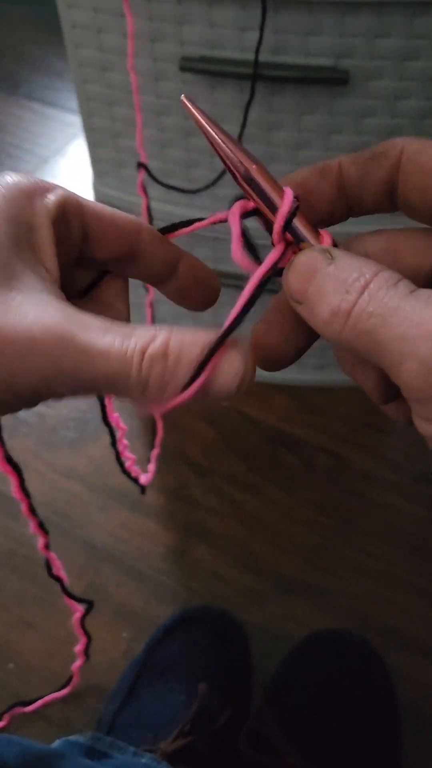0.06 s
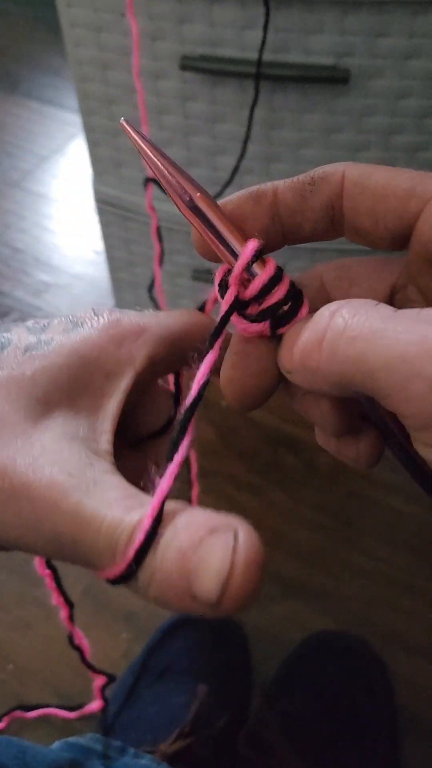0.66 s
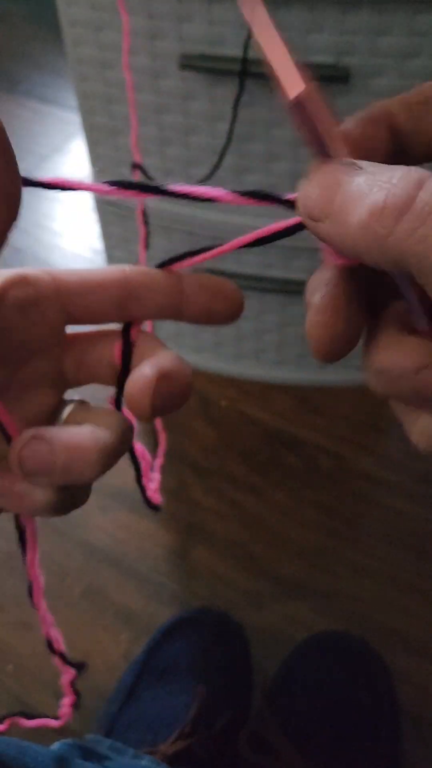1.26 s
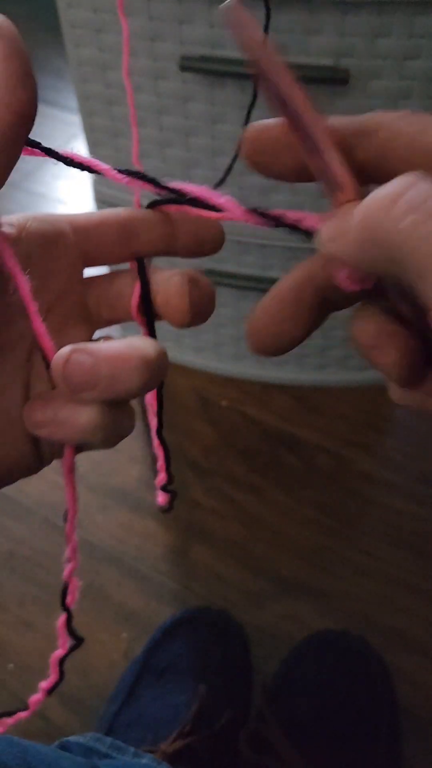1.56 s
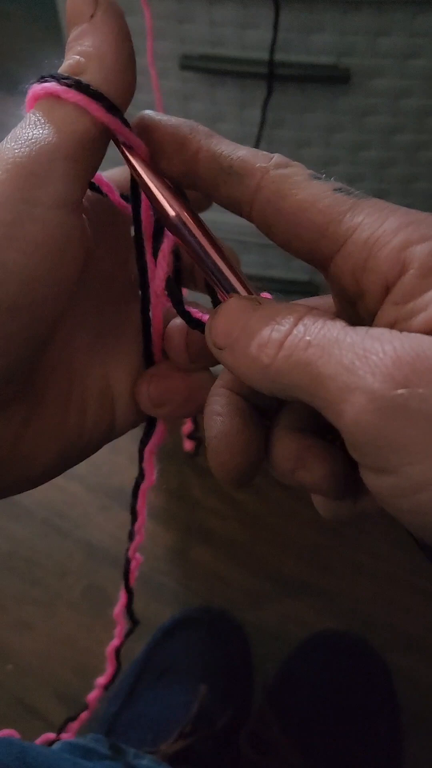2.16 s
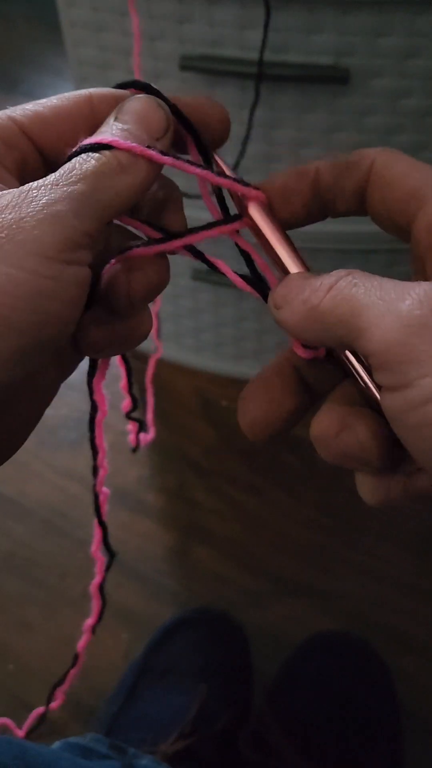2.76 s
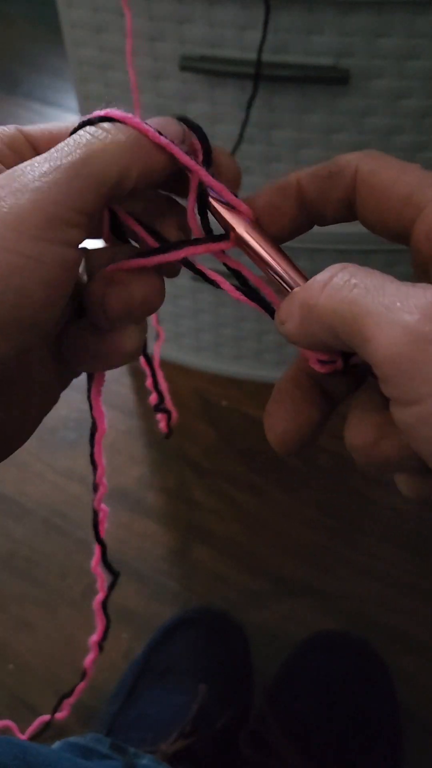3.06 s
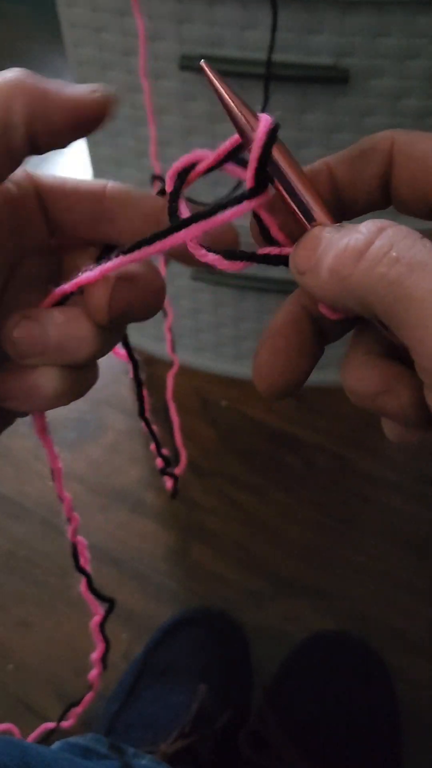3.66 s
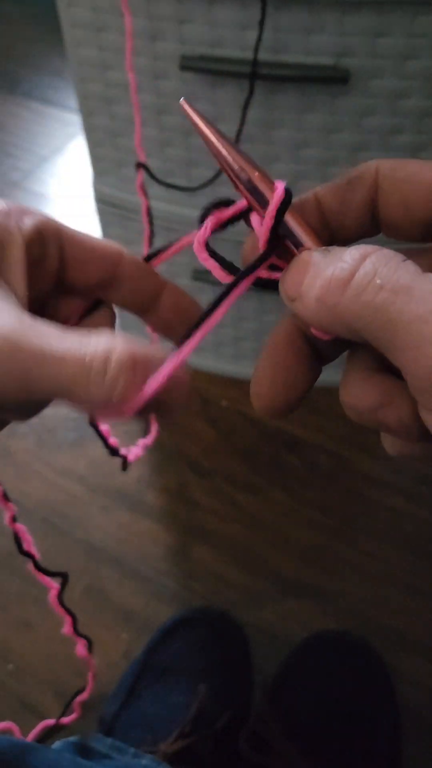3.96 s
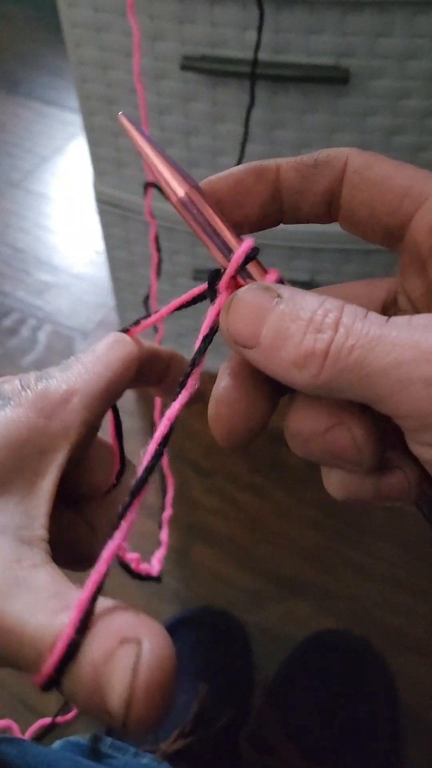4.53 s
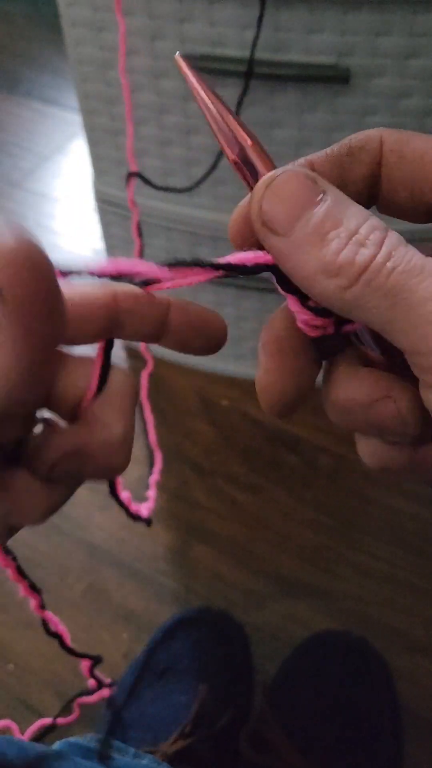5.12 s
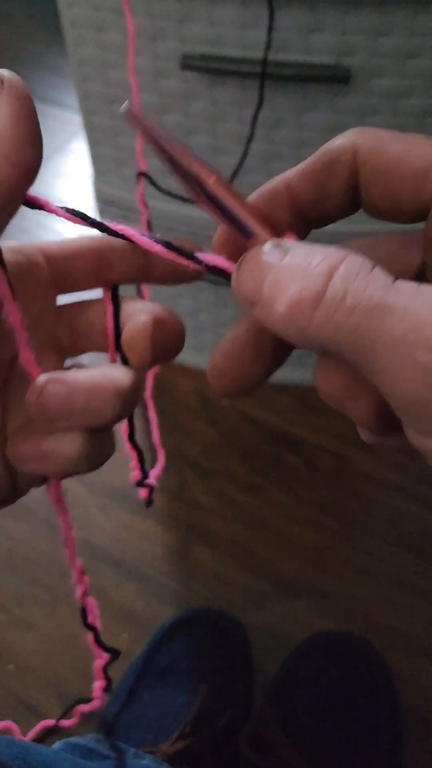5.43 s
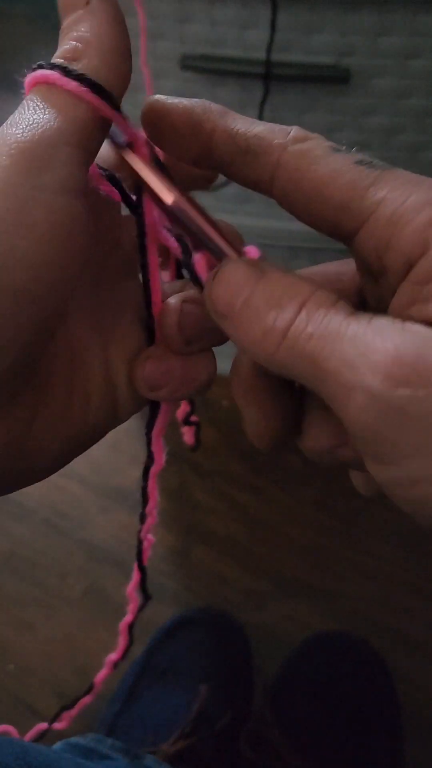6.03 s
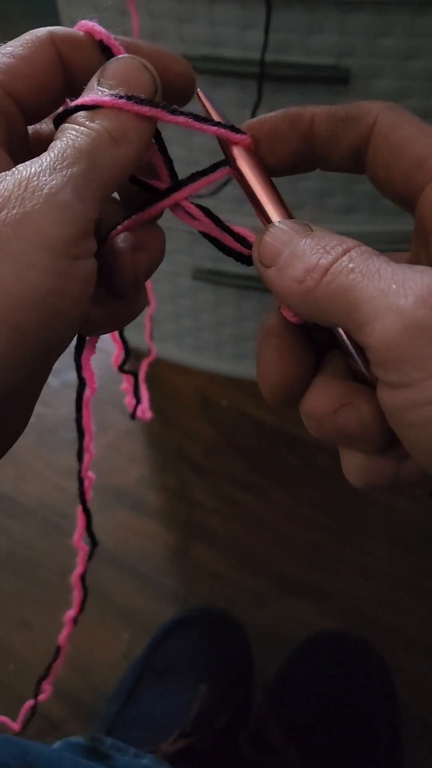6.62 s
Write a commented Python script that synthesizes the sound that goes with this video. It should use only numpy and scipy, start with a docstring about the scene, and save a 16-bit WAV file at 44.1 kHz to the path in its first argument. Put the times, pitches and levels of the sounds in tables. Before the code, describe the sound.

Very close to the microphone, yarn is drawn over fingers and metal knitting needles in soft, high, scratchy pulls and quick zips. Between pulls, a needle slides through the loops with a faint metallic ring, and strands now and then snap into place with a tiny tick. Later come a few dull, distant scuffs and one barely audible squeak. A low hum fills the quiet room throughout.

```python
"""Yarn rustles in long pulls as stitches are cast on to metal knitting needles, very close by.
The rustle is many tiny fibres catching and letting go. The needles sing faintly as they slide
through the loops, rubbing yarn gives one faint squeak, and strands snap into place with a tick.
A few soft scuffs sound further off, in a quiet room with a low hum."""
import sys
import numpy as np
from scipy import signal
from scipy.fft import rfft, irfft, next_fast_len
from scipy.io import wavfile
from scipy.ndimage import uniform_filter1d

SR = 44100
rng = np.random.default_rng(int(sys.argv[2]) if len(sys.argv) > 2 else 0)


def digitize_waveform(pressure):
    """Quantize a signal to 16-bit integers and store it at the path in sys.argv[1].

    Rows of a 2-D input are taken as channels; values are limited to [-1, 1].
    """
    field = np.atleast_2d(pressure).T
    bounded = np.clip(field, -1, 1)
    quanta = np.round(bounded * 32767).astype(np.int16)
    wavfile.write(sys.argv[1], SR, quanta)


N = 303665
TIME = np.arange(N) / SR
FFT_SIZE = next_fast_len(N)
FREQS = np.maximum(np.fft.rfftfreq(FFT_SIZE, 1 / SR), 1)
EARS = np.array([[1], [-1]])   # left, right
CUTOFF_HZ, YARN_LEFT_DB = 15450, 0.8


def from_db(db):
    """Turn decibels into a number to multiply by."""
    return 10 ** (np.asarray(db) / 20)


def unit_level(pair):
    """Scale a stereo sound so the average of its two sides has strength (rms) 1."""
    return pair / np.sqrt(np.mean(pair.mean(0) ** 2) + 1e-30)


def panned(left_db):
    """Two gains that make the left side left_db louder than the right."""
    return from_db(EARS * left_db / 2)


def over_hz(points):
    """Join (pitch_hz, value) points into a curve over all frequencies."""
    hz, value = np.transpose(points)
    return np.interp(np.log(FREQS), np.log(hz), value)


def stereo_tone(points):
    """Left and right gain curves from (pitch_hz, left_level_db, right_level_db) points."""
    return from_db([over_hz(np.array(points)[:, [0, side]]) for side in (1, 2)])


def filtered(pair, gain):
    """Turn each frequency of a sound up or down."""
    return irfft(rfft(pair, FFT_SIZE) * gain, FFT_SIZE)[:, :N]


def coloured(pair, gain):
    """Filter a sound, then bring it to strength 1."""
    return unit_level(filtered(pair, gain))


def resonance(hz, width_hz):
    """How a ringing object responds: most at its own pitch, less on either side."""
    return 1 / (1 + 1j * (FREQS ** 2 - hz ** 2) / (FREQS * width_hz))


def drift(rate_hz):
    """A smooth random wobble of strength 1."""
    return coloured(rng.standard_normal((1, N)), 1 / (1 + (FREQS / rate_hz) ** 2))[0]


def swell(middle_s, length_s):
    """A smooth rise and fall, at half strength a third of its length from the middle."""
    away = np.minimum(np.abs(3 * (TIME - middle_s) / length_s), 4)
    return np.exp(-np.log(2) * away ** 3)


# How far the room's sound leans left: pitch_hz, left_db
ROOM_BALANCE = [(80, -0.56), (260, -3.5), (400, -6), (600, 1.5), (900, -0.5), (1400, 5), (6500, 5),
                (9500, 8)]
# How alike the two sides are: pitch_hz, likeness (1 = the same)
EAR_LIKENESS = [(160, 0.99), (330, 0.86), (700, 0.38), (1400, 0.19), (4000, 0.069)]
def room_noise(gain, right_lag_s=0.00024):
    """Noise from all around: alike on both sides in the bass, unrelated in the treble."""
    alike = np.clip(over_hz(EAR_LIKENESS), -.999, .999)
    middle, side = rfft(rng.standard_normal((2, FFT_SIZE)))
    pair = irfft(np.sqrt(1 + alike) * middle + np.sqrt(1 - alike) * side * EARS, FFT_SIZE)
    delay = np.exp(1j * np.pi * FREQS * right_lag_s * EARS)
    return coloured(pair, gain * panned(over_hz(ROOM_BALANCE)) * delay)


# Pitches at which the surroundings ring: pitch_hz, boost_db
ROOM_RINGS = [(543, 7), (968, 4.5), (1570, 6), (1622, 5), (1718, 5), (1830, 5.5), (2292, 5.5)]
def room_ring(pair, width_hz=5.6):
    """The surroundings ring briefly at a few exact pitches."""
    boosts = sum((from_db(boost_db) - 1) * resonance(hz, width_hz) for hz, boost_db in ROOM_RINGS)
    return filtered(pair, 1 + boosts)


def wavering(tones):
    """Narrow bands of noise sound like tones that waver in strength and pitch."""
    bands = sum(from_db(db) / np.sqrt(width_hz) * np.abs(resonance(hz, 2 * width_hz)) ** 2
                for hz, width_hz, db in tones)
    return room_noise(bands)


def move_bass(pair, level_db, steady_above_hz=590):
    """The bass follows a level curve; the rest stays at the average level."""
    bass = filtered(pair, 1 / (1 + (FREQS / steady_above_hz) ** 6))
    return bass * from_db(level_db) + (pair - bass) * from_db(level_db.mean())


# The low hum, and fainter tones above it: pitch_hz, width_hz, relative_db
HUM_TONES = [(89.3, 2.9, 2), (82.7, 9.7, -2), (79.2, 1.8, -2), (109.7, 9.8, -12)]
FAINT_TONES = [(203.1, 3.8, -2), (231.4, 6, 3), (269.6, 1.8, -4.5), (299, 12, -12.5), (351, 30, -10.5),
               (636, 34, -10)]
# How the hum and the upper bass swell and sink: time_s, level_db
HUM_CURVE = [(0.0, -51), (1.1, -54), (2.9, -53), (3.55, -47), (3.85, -51), (4.15, -46.5), (4.52, -52.5),
             (4.75, -48.5), (5.5, -45), (6.0, -50), (6.3, -49)]
UPPER_BASS_CURVE = [(0.77, -65.5), (0.84, -70), (1.65, -65), (2.1, -66), (3.68, -61), (4.2, -65),
                    (5.4, -62), (6.19, -62), (6.89, -68.5)]
# Tone of the room's rumble and hiss: pitch_hz, relative_db
RUMBLE_TONE = [(12, -36), (31, -1), (48, 0.5), (80, -3.5), (115, -6.5), (170, -18.5), (270, -19.5),
               (380, -27), (460, -33.5), (620, -30.5), (850, -35), (1300, -52), (3000, -72)]
HISS_TONE = [(300, 3), (1000, 4), (2300, -0.5), (3200, -4), (4200, -6.5), (5400, -2.5), (6500, -13),
             (8000, -8), (11000, -7.5), (13500, -7)]
def room(hum_share=0.32):
    """A wavering low hum, a rumble that partly follows it, and a faint even hiss."""
    hum_db = np.interp(TIME, *np.transpose(HUM_CURVE))
    bass_db = np.interp(TIME, *np.transpose(UPPER_BASS_CURVE))
    hum = wavering(HUM_TONES)
    hum_power = uniform_filter1d(hum.mean(0) ** 2, size=SR // 4)
    hum = unit_level(hum / np.sqrt(hum_power))   # keep only the quick flutter
    faint_tones = move_bass(wavering(FAINT_TONES), bass_db - 4)
    rumble_db = bass_db + hum_share * (hum_db - bass_db) + 6.5
    rumble = move_bass(room_noise(from_db(over_hz(RUMBLE_TONE))), rumble_db)
    hiss = from_db(-78) * room_noise(from_db(over_hz(HISS_TONE)))
    return from_db(hum_db) * hum + faint_tones + room_ring(rumble + hiss)


# Soft swells of deep rumble: middle_s, length_s, level_db
RUMBLE_SWELLS = [(3.402, 0.34, -62), (6.61, 0.59, -52.5)]
def deep_rumble():
    """The deepest rumble rises and falls now and then."""
    strength = sum(from_db(db) * swell(middle_s, length_s) for middle_s, length_s, db in RUMBLE_SWELLS)
    return strength * room_noise(resonance(hz=38, width_hz=28) ** 2)


# The tone all scuffs share: pitch_hz, relative_db
SCUFF_TONE = [(380, 2), (470, 0.5), (620, 7), (770, -1), (950, 2), (1280, -12.5), (1650, -0.5),
              (1900, -0.5), (2500, -14), (3350, -8.5), (4150, -42)]
# Scuffs further off: start_s, rise_s, level_db, pitch_hz, width (as a share of the pitch)
SOFT_SCUFFS = [(4.853, 0.024, -64.5, 705, 1.6), (4.89, 0.023, -62.5, 420, 1.64),
               (5.016, 0.04, -62.5, 1430, 4.1), (5.295, 0.035, -65, 380, 3), (5.455, 0.06, -72.5, 795, 1.8),
               (5.688, 0.033, -62.5, 390, 0.62), (6.45, 0.044, -72, 450, 1.4), (6.77, 0.028, -73, 516, 1.4)]
def scuffs():
    """Dull brushing noises rise quickly and fade, each around its own pitch."""
    out = np.zeros((2, N))
    brush = room_noise(from_db(over_hz(SCUFF_TONE)))
    for start_s, rise_s, level_db, hz, width in SOFT_SCUFFS:
        age = np.clip((TIME - start_s) / rise_s, 0, 20)
        strength = from_db(level_db) * (age * np.exp(1 - age)) ** 1.6
        out += strength * coloured(brush, resonance(hz, width * hz) ** 3)
    return room_ring(out)


def squeak(middle_s=5.62, length_s=0.28, level_db=-87, pitch_hz=3640, width_hz=70, rise_hz_per_s=2200):
    """A thin, faint squeak of rubbing yarn climbs in pitch."""
    phase = 2 * np.pi * np.cumsum(pitch_hz + rise_hz_per_s * (TIME - middle_s)) / SR
    rasp = np.array([drift(width_hz) * np.cos(phase) + drift(width_hz) * np.sin(phase) for _ in EARS])
    return from_db(level_db) * swell(middle_s, length_s) * unit_level(rasp) * panned(YARN_LEFT_DB)


# A strand snaps against a needle: start_s, relative_db, left_db, lowest_hz, fade_s
STRAND_SNAPS = [(0.4068, -71, 1, 6000, .0007), (0.5116, -57.5, 6, 6400, .00055),
                (4.3902, -55.5, 11, 5900, 0.00063), (5.4065, -69, 12, 4600, 0.0022),
                (5.547, -66, 3, 4530, .0016)]
def ticks():
    """A quick snap gives a bright crack; a slower slip gives a softer, longer scratch."""
    out = np.zeros((2, N))
    cut_highs = signal.butter(2, CUTOFF_HZ, fs=SR, output="sos")
    for start_s, db, left_db, lowest_hz, fade_s in STRAND_SNAPS:
        cut_lows = signal.butter(3, lowest_hz, "high", fs=SR, output="sos")
        age = np.maximum(TIME - start_s, 0) / fade_s
        sounding = (age > 0) & (age < 20)
        burst = rng.standard_normal((2, sounding.sum())) * age[sounding] * np.exp(-2 * age[sounding])
        crack = signal.sosfilt(np.vstack([cut_lows, cut_highs]), burst)
        crack /= np.abs(crack).max(axis=1, keepdims=True)
        out[:, sounding] += crack * from_db(db + 12) * panned(left_db)
    return out


def friction(slips_per_s, spread_db, clump_db, hiss_gain):
    """Fibres catch and let go: tiny clicks of uneven size, in clumps, over a smooth hiss."""
    slips = rng.random(N) < slips_per_s / SR
    sizes = from_db(spread_db * np.minimum(rng.exponential(1, N), 4))
    clicks = unit_level(slips * sizes * rng.standard_normal((2, N)))   # each side hears a slip its own way
    hiss = hiss_gain * rng.standard_normal((2, N))
    return (clicks + hiss) * from_db(clump_db * drift(rate_hz=40))


# Tone of rustling fibres: pitch_hz, left_level_db, right_level_db
FIBRE_TONE = [(2810, -12, -19.5), (5000, -6, -18), (5370, -2.5, -18), (6920, -6.5, -8), (7440, -3, -3),
              (8260, -2.5, -8), (10060, 1, -9), (12000, 2.5, 0.5), (12500, -4, 1.5), (14540, -3, -2.5),
              (17000, -7.5, -15)]
def fibre_rustle(rub, band):
    """Rubbing fibres make a high rustle; band picks which part of it is heard."""
    return coloured(rub, stereo_tone(FIBRE_TONE) * band)


# The notes a needle rings at, lowest first: pitch_hz, width_hz, relative_db, left_db
NEEDLE_NOTES = [(6146, 320, 5.5, 6), (7930, 790, -9, 5), (8770, 530, 2, -8.5), (10540, 320, -2.5, 11),
                (11320, 560, -4, -2), (14170, 760, 0.5, -8)]
def needle_ring(rub, notes, wander_db=0):
    """Rubbing makes a needle ring; wander_db shifts the mix of notes as the touching point moves."""
    out = 0
    for hz, width_hz, db, left_db in notes:
        ring = coloured(rub, np.abs(resonance(hz, width_hz)) ** 2 * panned(left_db))
        out += ring * np.sqrt(width_hz) * from_db(db + wander_db * drift(rate_hz=2.6))
    return unit_level(out)


# A needle slides through a loop: middle_s, length_s, relative_db, low_note_db, favoured_hz
NEEDLE_SLIDES = [(1.907, 0.054, -78.5, 6, 8750), (1.99, 0.12, -76, -3, 8000),
                 (2.083, 0.075, -72.5, 2, 8800), (2.145, 0.055, -82, 4, 8800),
                 (2.234, 0.13, -71, -1, 11700), (2.378, 0.1, -69.5, -2.5, 10800),
                 (3.009, 0.076, -70.5, -3, 9050), (3.229, 0.16, -68.5, -0.5, 11400),
                 (3.295, 0.11, -74.5, -7, 13700), (5.849, 0.034, -80.5, 5.5, 8800),
                 (5.906, 0.13, -75.5, -6, 13300), (6.132, 0.21, -74, -4, 10200),
                 (6.204, 0.06, -72.5, -13, 10400)]
def needles(favour_db=8, favour_width_hz=300, whistle_width_hz=82):
    """The loop plays the needle like a bow; where it touches decides which notes stand out."""
    rub = friction(slips_per_s=1400, spread_db=-0.5, clump_db=0.8, hiss_gain=1.7)
    low_hz, _, _, low_left_db = NEEDLE_NOTES[0]
    low_note = needle_ring(rub, NEEDLE_NOTES[:1])
    whistle = coloured(rub, resonance(low_hz, whistle_width_hz) ** 2 * panned(low_left_db))
    high_notes = needle_ring(rub, NEEDLE_NOTES[1:])
    fibres = from_db(-8.5) * fibre_rustle(rub, band=1 / (1 + (10000 / FREQS) ** 6))
    out = np.zeros((2, N))
    for middle_s, length_s, db, low_note_db, favoured_hz in NEEDLE_SLIDES:
        peak_filter = signal.iirpeak(favoured_hz, favoured_hz / favour_width_hz, fs=SR)
        favoured = signal.lfilter(*peak_filter, high_notes)
        high = unit_level(high_notes + (from_db(favour_db) - 1) * favoured)
        # In gentle slides, the low note stands out as a thin whistle.
        low = whistle if low_note_db > 2 else low_note
        # The high notes gain a little as the low note weakens.
        ring = from_db(low_note_db - 6.5) * low + from_db(-0.19 * low_note_db) * high
        out += swell(middle_s, length_s) * from_db(db - 4) * panned(left_db=3) * (ring + fibres)
    return out


# Yarn gives way in a quick zip: middle_s, length_s, relative_db, tightness (0 slack to 1 tight)
YARN_ZIPS = [(0.13, 0.045, -58, 0.95), (1.025, 0.031, -75, 0.62), (1.317, 0.088, -70, 0.57),
             (1.592, 0.088, -70.5, 0.8), (3.81, 0.08, -69.5, 0.92), (3.84, 0.046, -60.5, 1),
             (4.41, 0.088, -72, 0.38), (5.072, 0.067, -67.5, 0.69)]
# Yarn is drawn over fingers and needles: start_s, length_s, relative_db, growth_db, tightness
YARN_PULLS = [(-0.02, 0.22, -70.5, -15, 0.76), (0.07, 0.13, -60.5, -1.5, 0.9),
              (0.2, 0.12, -67.5, 4.5, 0.81), (0.374, .125, -77, 12.5, 0.67), (0.9, 0.32, -83.5, 3, 0.54),
              (1.176, 0.27, -71.5, 0, 0.58), (1.389, 0.12, -68.5, 2.5, 0.74), (1.53, 0.28, -90.5, -8, 0.06),
              (2.43, .3, -87.5, -4, 0.72), (3.832, 0.2, -80, -8, 0.67), (3.967, .25, -71, 0, 0.72),
              (4.227, 0.23, -69.5, -4, 0.74), (4.822, 0.088, -77, 1, 0.7), (5.006, 0.17, -78, -4, 0.59),
              (5.212, 0.29, -77.5, 0, 0.55), (5.5, 0.24, -84, -1, 0.18), (6.184, 0.26, -82, -5, 0.69)]
def handwork(rise_s=0.03, fade_s=0.03):
    """How strongly the yarn moves and how tight it is; the strongest stroke counts most."""
    strokes = [(swell(middle_s, length_s) * from_db(db), tightness)
               for middle_s, length_s, db, tightness in YARN_ZIPS]
    for start_s, length_s, db, growth_db, tightness in YARN_PULLS:
        age_s = TIME - start_s
        rise = np.clip(age_s / rise_s, 0, 1)
        fade = np.exp(-np.maximum(age_s - length_s, 0) / fade_s)
        progress = np.clip(age_s / length_s, 0, 1) - .5
        strokes.append((rise * fade * from_db(db + growth_db * progress), tightness))
    power = sum(gain ** 2 for gain, _ in strokes) + 1e-20
    return np.sqrt(power), sum(gain ** 2 * tightness for gain, tightness in strokes) / power


# Tone of yarn rubbing on skin: pitch_hz, left_level_db, right_level_db
SKIN_TONE = [(400, -17, -25), (1150, 10, 7), (2230, 7, 3), (3580, 7.5, -28), (5900, -12.5, -2),
             (7600, 2.5, -14), (15000, -9, -43)]
def yarn():
    """Tight yarn rustles brightly; slack yarn rubs dully on the skin and rings the needle more."""
    strength, tightness = handwork()
    skin_db = np.interp(tightness, (0, 1), (9.5, -29.5))
    bright_db = np.interp(tightness, (0, 1), (-31, 15))
    fibre_rub = friction(slips_per_s=3000, spread_db=1.5, clump_db=0.88, hiss_gain=2.0)
    # Tight yarn slips faster, so the top of the rustle takes over.
    top = 1 / (1 + (11000 / FREQS) ** 6)
    dull, bright = fibre_rustle(fibre_rub, 1 - top), fibre_rustle(fibre_rub, top)
    fibres = (dull + from_db(bright_db + 2) * bright) / (1 + from_db(bright_db + 4.5))
    skin_rub = friction(slips_per_s=5800, spread_db=-1.5, clump_db=2.5, hiss_gain=3.4)
    skin = from_db(skin_db) * coloured(skin_rub, stereo_tone(SKIN_TONE))
    ring = needle_ring(rng.standard_normal((2, N)), NEEDLE_NOTES[1:], wander_db=2.5)
    ring *= from_db(-15 - 0.4 * bright_db)
    return from_db(3.5) * strength * (fibres + skin + ring) * panned(YARN_LEFT_DB)


def scene():
    """The knitting close by, the room behind it."""
    return yarn() + needles() + squeak() + ticks() + scuffs() + room() + deep_rumble()


def record(dry, fade_s=0.006):
    """Cut off the highest treble and ease the sound in and out."""
    cut_highs = signal.ellip(12, .1, 80, CUTOFF_HZ, fs=SR, output="sos")
    ends = np.clip(np.minimum(TIME, TIME[-1] - TIME) / fade_s, 0, 1)
    return np.sin(np.pi / 2 * ends) ** 2 * signal.sosfilt(cut_highs, dry)


dry = scene()
out = record(dry)
digitize_waveform(out)
```